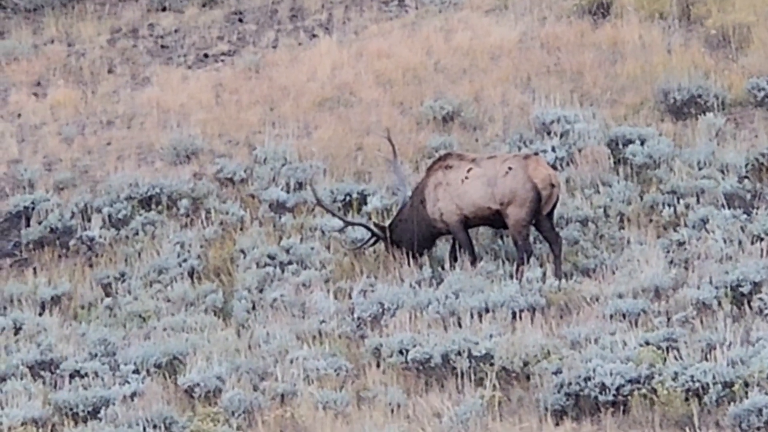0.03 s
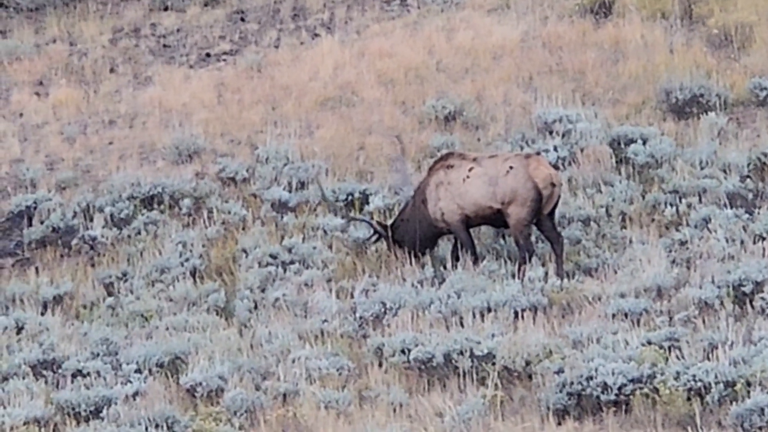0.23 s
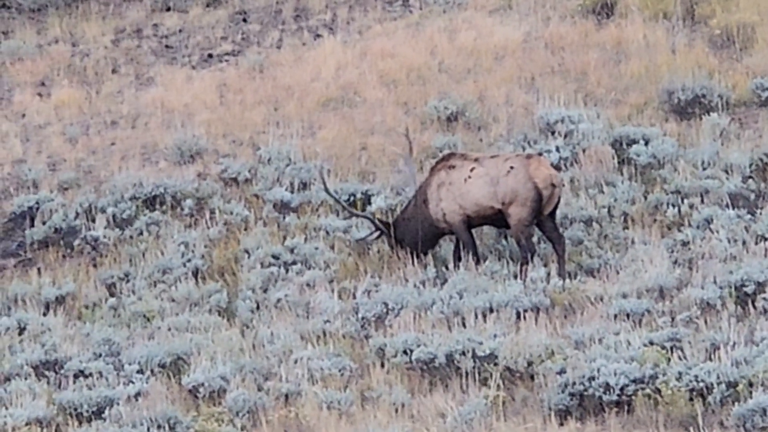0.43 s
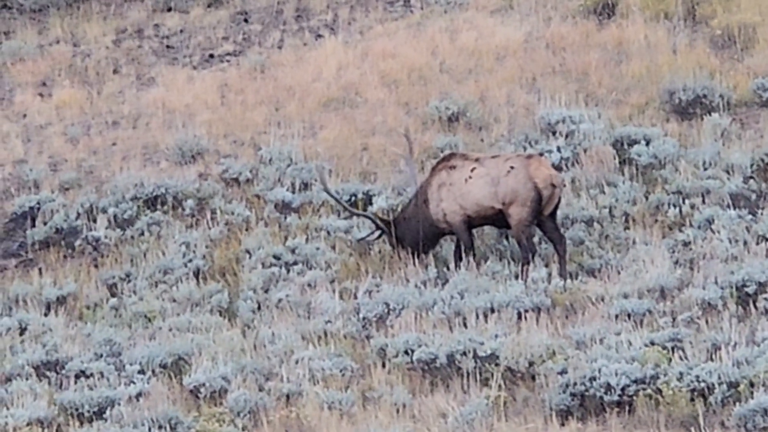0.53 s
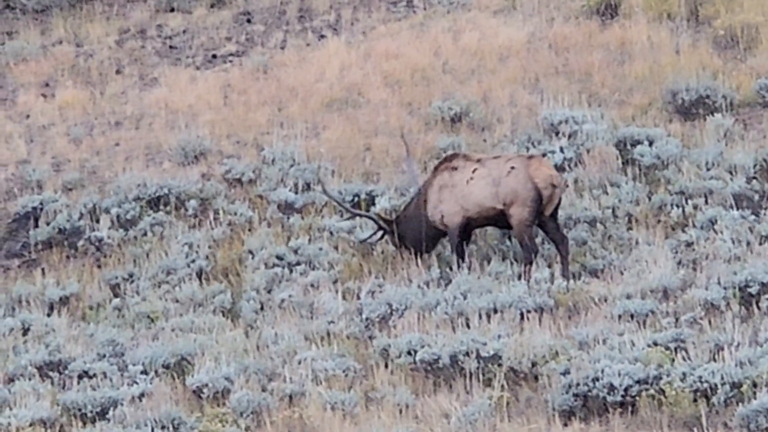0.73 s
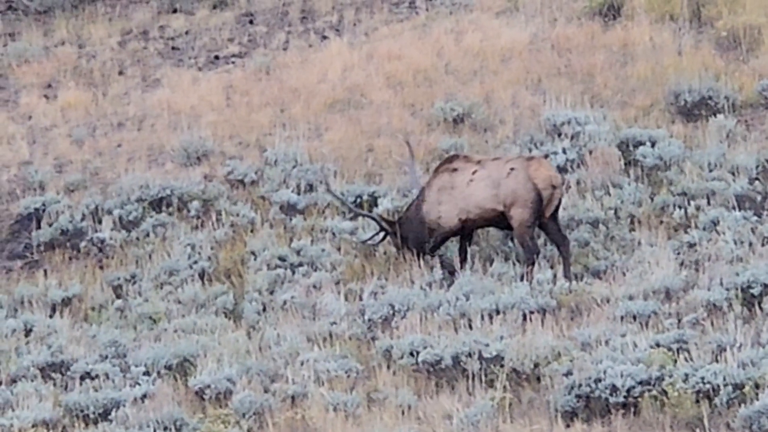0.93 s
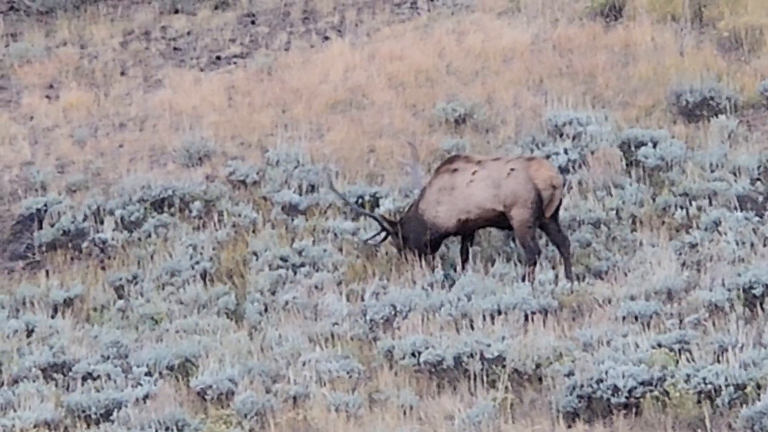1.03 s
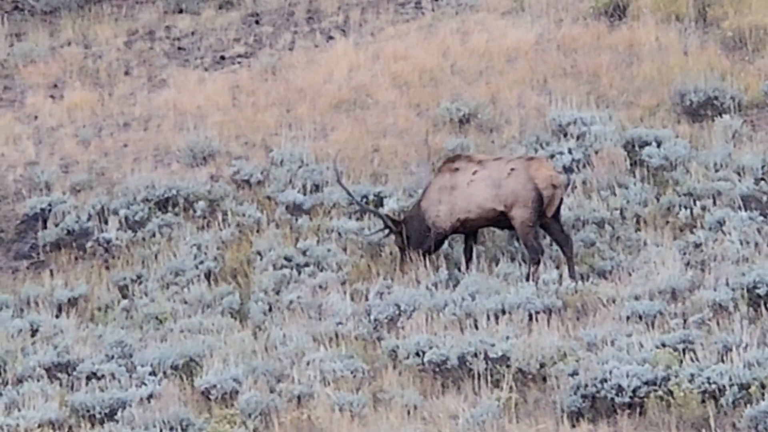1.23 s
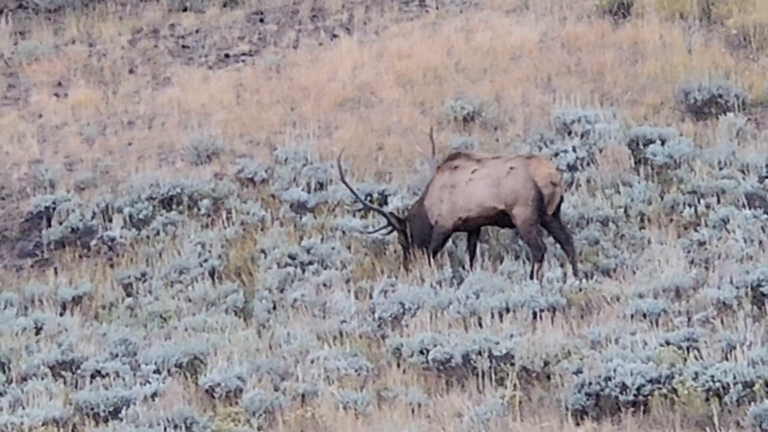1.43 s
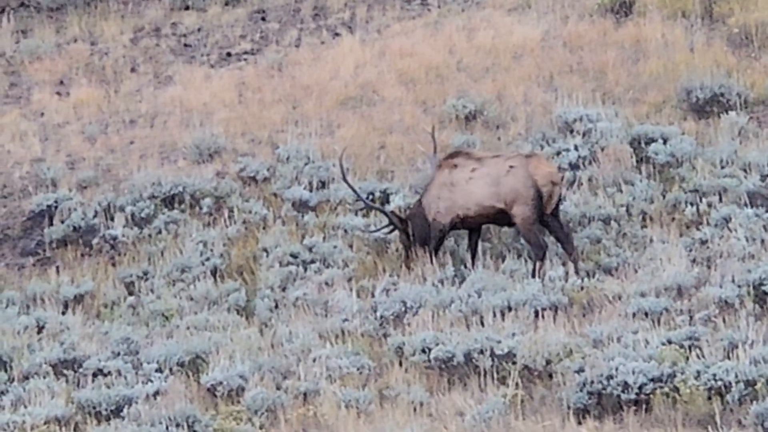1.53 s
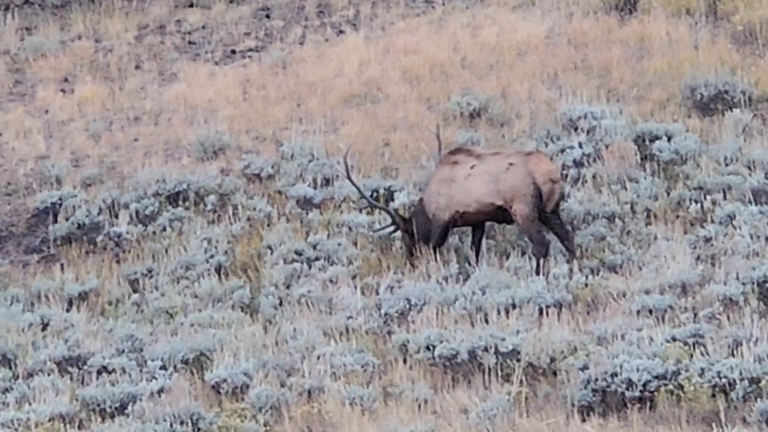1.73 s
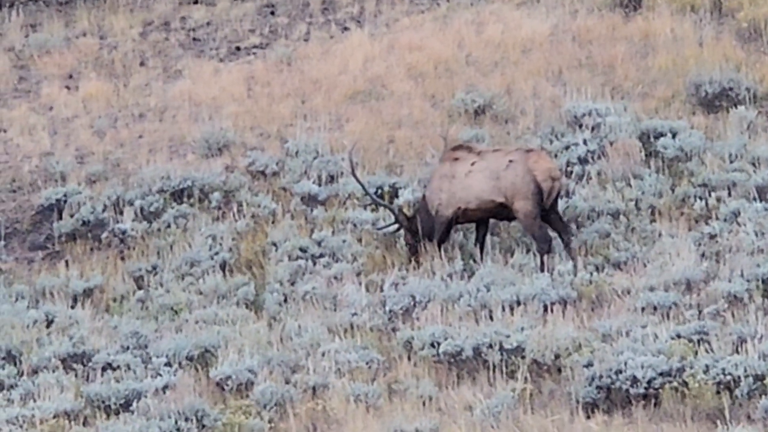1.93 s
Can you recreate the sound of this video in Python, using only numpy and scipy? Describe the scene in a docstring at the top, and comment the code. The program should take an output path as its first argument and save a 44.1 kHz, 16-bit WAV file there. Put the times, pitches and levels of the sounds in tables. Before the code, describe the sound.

Wind gently buffets the microphone over airy hiss, with faint small bird chirps.

```python
"""Soft thuds of wind over the steady airy hiss of an open hillside swell into one gust, then die down.
The wind is heard as the pressure of turbulent eddies on the two ports of the microphone.
Far traffic drones, and a small bird gives thin U-shaped chirps from the two sides of its syrinx.
Far whistles, a tiny tick, a soft crunch in the brush and a dull bump barely rise above the hiss."""
import sys
import numpy as np
from scipy import signal
from scipy.fft import rfft, irfft
from scipy.io import wavfile
from scipy.ndimage import uniform_filter1d

SR = 44100
rng = np.random.default_rng(int(sys.argv[2]) if len(sys.argv) > 2 else 0)


def dump_mix(stems):
    """Bounce the given channels to the path in sys.argv[1] as a 16-bit WAV at rate SR."""
    frames = np.atleast_2d(stems).T  # one column per channel
    limited = np.clip(frames, -1, 1)  # hard clip at full scale
    pcm = np.round(limited * 32767).astype(np.int16)
    wavfile.write(sys.argv[1], SR, pcm)


N = 88200
T = np.arange(N) / SR
FREQS = np.maximum(np.arange(N // 2 + 1) * SR / N, 1)

# microphone self-noise (frequency [Hz], relative density [dB])
SELF_NOISE_SPECTRUM = [(7000, -35), (9400, -18), (10300, -12), (11000, -15), (11800, -9.5), (13000, -7),
                       (14000, -6), (14700, 0), (15300, -4), (15700, -5.5)]
# air over the slope (frequency [Hz], relative density [dB], balance [dB]); balance is left minus right
AIR_SPECTRUM = [(61, -7, -2.5), (192.5, 3.5, -8), (295.6, 1.5, 7.5), (432, -3.5, -5), (617, -8, 0.5),
                (760, -8, 2.5), (1076, -9, -1), (1555, -10.5, -1), (2430, -14, -3.5), (2750, -19, 1),
                (3560, -16, -6.5), (4720, -22, -3.5), (5590, -26.5, -2), (6880, -33.5, 3), (7800, -32.5, 1),
                (8900, -46.5, 0), (12500, -53.5, -3)]
# far road noise (centre [Hz], width [Hz], level [dB], balance [dB])
TRAFFIC_BANDS = [(405.5, 48, -74.5, 5), (1013, 140, -82, -8.5), (3820, 800, -91, 2.5)]
# far whistles (time [s], half length [s], pitch [Hz], level [dB])
FAR_WHISTLES = [(.325, .022, 980, -79), (.44, .022, 970, -80), (.897, .022, 2940, -79.5)]
# crunch of dry stems (time [s], level [dB])
CRUNCH_PEAKS = [(1.48, -67.5)]
# resonances of the crunch (centre [Hz], width [Hz], relative level [dB])
CRUNCH_BANDS = [(980, 350, 0), (2300, 650, -4)]
# bright tick (time [s], level [dB], balance [dB])
TICK_PEAKS = [(.895, -76.5, 5)]
# chirps (middle time [s], length [s], lowest pitch [Hz], fall [Hz], rise [Hz],
# relative level of the fall [dB], relative level of the rise [dB], balance [dB])
CHIRP_SWEEPS = [(0.265, 0.015, 6650, 1800, 2000, -78, -77, -2),
                (0.529, 0.02, 7400, 1000, 1300, -85, -84, -8),
                (0.586, 0.014, 7150, 2000, 2100, -70, -70, -1),
                (.649, 0.015, 6490, 2500, 2200, -70, -72.5, -8),
                (0.882, 0.022, 6350, 300, 2700, -84, -75, 5),
                (1.126, 0.028, 6650, 2500, 4000, -78, -71.5, 1),
                (1.240, 0.023, 6340, 1700, 2700, -78, -70.5, -1),
                (1.376, 0.026, 6200, 2200, 2800, -77.5, -67.5, -4),
                (1.618, .028, 6600, 2100, 1600, -77, -83, 0)]
# single eddies (time [s], half length [s], relative level [dB], balance [dB], frequency [Hz])
EDDY_IMPACTS = [(0.034, 0.031, -49, 4, 62.8), (0.238, 0.028, -45, 3.5, 47.1), (0.321, 0.015, -40, 20, 51),
                (0.322, 0.016, -55, 12, 130), (0.388, 0.011, -39, 9, 72), (0.421, 0.015, -31, 8, 55),
                (0.437, 0.013, -40.5, 7, 112), (.481, 0.015, -38, -8.5, 45), (0.514, 0.018, -31, 5, 55),
                (0.52, 0.013, -44.5, 12, 112), (0.623, 0.0073, -46.5, 14, 138), (0.642, 0.025, -41, 12, 58),
                (.686, .015, -41.5, 3, 98), (0.722, .021, -31.5, 1.5, 45), (0.817, 0.016, -29.5, 4, 50),
                (.902, 0.0092, -36.5, 21, 50.4), (1.009, 0.02, -39.5, -4, 43),
                (1.085, 0.0088, -39, -35, 46), (1.225, 0.0081, -44.5, -11, 39),
                (1.433, 0.057, -50.5, -15, 49), (1.521, 0.022, -42, -6, 44.7),
                (1.733, 0.0081, -40.5, 7, 46.4), (1.848, 0.017, -48, 6, 49)]
# course of the gust (time [s], relative level [dB], balance [dB])
GUST_ENVELOPE = [(0, -58, 3), (.18, -57, 3), (.36, -55, 6), (.40, -47, 4), (.5, -44, 3), (.56, -46, 3),
                 (.67, -45, 4), (.76, -50, 5), (.95, -52, 2), (1.06, -53, 0), (1.12, -60, 3),
                 (1.3, -57, -1), (1.48, -52, -4), (1.65, -61, 0), (1.7, -55, 6), (1.8, -59, 3), (2, -59, 2)]
# rumble at the height of the gust (frequency [Hz], relative density [dB])
GUST_SPECTRUM = [(12, -27.5), (24, -6.5), (42, -1), (60, -5), (90, -6), (120, -10.5), (160, -26),
                 (250, -45.5), (1500, -120)]
# rumble in the lull (frequency [Hz], relative density [dB])
LULL_SPECTRUM = [(12, -22), (24, -1), (42, 2.5), (68, -5.5), (95, -20), (130, -19), (200, -30.5),
                 (400, -49), (1500, -120)]


def undb(db):
    """Amplitude grows tenfold for every 20 dB."""
    return 10 ** (np.asarray(db) / 20)


def unit(x):
    """Normalisation to an rms of 1."""
    return x / np.sqrt(np.mean(x ** 2))


def colour(points, column=1):
    """Spectral envelope: a table column interpolated over log frequency."""
    table = np.array(points, float)
    return np.interp(np.log(FREQS), np.log(table[:, 0]), table[:, column])


def resonance(hz, width_hz):
    """Resonance: the squared magnitude of a second-order band-pass."""
    return 1 / (1 + ((FREQS ** 2 - hz ** 2) / (FREQS * width_hz * 0.98)) ** 2)


def shape(x, gain):
    """Linear filtering: the spectrum is multiplied by a gain per frequency."""
    return irfft(rfft(x) * gain, N)


def noise(gain, channels=2):
    """Filtered white noise of rms 1, incoherent between channels."""
    return unit(shape(rng.standard_normal((channels, N)), gain))


def walk(rate_hz):
    """Random modulation: low-passed noise of rms 1."""
    return noise(np.exp(-(FREQS / rate_hz) ** 2), channels=1)[0]


def pan(balance_db):
    """Constant-power panning: left and right gains for a level difference."""
    gains = undb(np.array([np.atleast_1d(balance_db), -np.atleast_1d(balance_db)]) / 2)
    return gains / np.sqrt(np.mean(gains ** 2, axis=0))


def arrive(x, lag_s):
    """Path difference: sound from the left reaches the right port later."""
    return shape(x, np.exp(-2j * np.pi * FREQS * np.array([[0], [lag_s]])))


def even(x, span_s, amount):
    """Envelope compression: swells slower than the span are flattened by an amount from 0 to 1."""
    size = int(span_s * SR)
    power = abs(signal.hilbert(x)) ** 2
    smoothed = uniform_filter1d(uniform_filter1d(power, size), size)
    return unit(x / smoothed ** (amount / 2))


def air():
    """Diffuse field: incoherent hiss from the whole slope, each half octave flickering on its own."""
    level_db, flicker_db = -66.5, 0.59
    hiss = noise(undb(colour(AIR_SPECTRUM)) * pan(colour(AIR_SPECTRUM, column=2)))
    half_octaves = np.clip(2 * np.log2(FREQS / 125), 0, 13)
    out = 0
    for k in range(14):
        band = shape(hiss, np.maximum(1 - abs(half_octaves - k), 0))
        out += band * undb(flicker_db * walk(29))
    return out * undb(level_db)


def traffic():
    """Band-limited noise: the drone and tyre hiss of a far road keep a nearly constant level."""
    road = 0
    for hz, width_hz, db, balance_db in TRAFFIC_BANDS:
        band = noise(resonance(hz, width_hz), channels=1)
        road += even(band, span_s=0.11, amount=0.76) * undb(db) * pan(balance_db)
    return arrive(road, lag_s=0.00033)


def far_bird():
    """Frequency modulation: slight random changes of pitch make short pure whistles waver."""
    clock = np.cumsum(1 + 0.012 * walk(80)) / SR
    out = 0
    for time_s, half_s, hz, db in FAR_WHISTLES:
        tone = np.sqrt(2) * np.sin(2 * np.pi * hz * clock)
        out += tone * undb(db) * np.exp(-((T - time_s) / half_s) ** 2)
    return out


def brush_crunch():
    """Noise-excited resonance: dry stems crunch with a fast rise and an exponential decay."""
    attack_s, decay_s = 0.006, 0.015
    body = noise(sum(undb(db) * resonance(hz, width_hz) for hz, width_hz, db in CRUNCH_BANDS))
    envelope = 0
    for time_s, db in CRUNCH_PEAKS:
        envelope += undb(db) * np.exp(-np.maximum((time_s - T) / attack_s, (T - time_s) / decay_s))
    return body * envelope


def bump():
    """A pulse of low-frequency noise is heard as a dull knock, alike on both sides."""
    time_s, half_s, level_db = 1.732, 0.012, -65
    body = noise(resonance(hz=290, width_hz=220), channels=1)
    return body * undb(level_db) * np.exp(-((T - time_s) / half_s) ** 2)


def tick():
    """A very short pulse of high-frequency noise is heard as a bright tick."""
    half_s = 0.0013
    burst = noise(resonance(hz=7800, width_hz=3200), channels=1)
    return sum(burst * undb(db) * np.exp(-((T - time_s) / half_s) ** 2) * pan(balance_db)
               for time_s, db, balance_db in TICK_PEAKS)


def small_bird():
    """Two-voice phonation: both sides of the syrinx dive and climb; scattering in brush adds a tail."""
    bend_exponent, pitch_wobble = 2.4, 0.013
    dip_db, trim_db, flutter_db = -11, -2.5, 1.8
    second_lead_s, second_db = 0.0017, -11  # one side sweeps earlier and is weaker
    scatter_s, scatter_db = 0.02, -4
    direct = np.zeros((2, N))
    for time_s, length_s, low_hz, fall_hz, rise_hz, fall_db, rise_db, balance_db in CHIRP_SWEEPS:
        u = np.clip((T - time_s) / (length_s / 2), -1, 1)  # -1 to 1 across the chirp
        swell = np.sin(np.pi * u ** 2) + undb(dip_db) * (1 - u ** 2) ** 2  # loudest on the flanks
        flank_db = np.interp(u, [-0.5, 0.5], [fall_db, rise_db])
        envelope = swell * undb(flank_db + trim_db + flutter_db * walk(500))
        depth_hz = np.where(u < 0, fall_hz, rise_hz)
        for lead_s, voice_db in ((0, 0), (second_lead_s, second_db)):
            hz = low_hz + depth_hz * np.minimum(abs(u + 2 * lead_s / length_s), 1) ** bend_exponent
            cycles = np.cumsum(hz * (1 + pitch_wobble * walk(720))) / SR
            direct += undb(voice_db) * envelope * np.sin(2 * np.pi * cycles) * pan(balance_db)
    tail = rng.standard_normal((2, N)) * np.exp(-T / scatter_s)
    scattered = shape(direct, rfft(unit(tail)) / np.sqrt(N))
    return arrive(direct, lag_s=0.00047) + undb(scatter_db) * scattered


def buffets():
    """Pressure pulses: each eddy striking the microphone is a thud of a few uneven, slowing swings."""
    wander_rad, trim_db = 0.53, -2.5
    slowing, skew_share = 0.1019, 0.71
    wander = wander_rad * np.array([walk(24), walk(36)])
    phases = rng.uniform(-np.pi, np.pi, (len(EDDY_IMPACTS), 2))
    out = 0
    for (time_s, half_s, db, balance_db, hz), (phase, skew) in zip(EDDY_IMPACTS, phases):
        u = (T - time_s) / half_s
        cycles = np.cumsum(hz * (1 - slowing * np.tanh(u))) / SR
        port_phase = phase + skew_share * np.array([[0], [skew]])  # the ports swing out of step
        swing = np.sqrt(2) * np.sin(2 * np.pi * cycles + wander + port_phase)
        out += swing * np.exp(-u ** 2) * undb(db + trim_db) * pan(balance_db)
    return out


def port_pressure(correlation):
    """Partial coherence: the two ports share part of their random pressure."""
    separate, shared = rng.standard_normal((2, N)), rng.standard_normal(N)
    return np.sqrt(1 - correlation) * separate + np.sqrt(correlation) * shared


def wind():
    """Turbulence: small eddies push on each port, and stronger wind sheds faster ones."""
    onset_db, knee_db, trim_db = -47.5, 6.5, 1.5
    times, levels, balances = np.array(GUST_ENVELOPE).T
    db = np.interp(T, times, levels)
    pressure = port_pressure(correlation=0.37)
    gust = unit(shape(pressure, undb(colour(GUST_SPECTRUM))))
    lull = unit(shape(pressure, undb(colour(LULL_SPECTRUM))))
    gust_share = 0.5 + 0.5 * np.tanh((db - onset_db) / knee_db)
    eddies = even(gust_share * gust + (1 - gust_share) * lull, span_s=0.029, amount=0.84)
    return eddies * undb(db + trim_db) * pan(np.interp(T, times, balances))


def scene():
    """Superposition: the pressures of all sources add at the microphone."""
    return (wind() + buffets() + air() + traffic() + small_bird()
            + tick() + far_bird() + brush_crunch() + bump())


def record(dry):
    """Self-noise and bandwidth: the microphone adds a thin hiss, and a steep low-pass cuts the top."""
    hiss_db, cutoff_hz = -80, 15750
    hiss = noise(undb(colour(SELF_NOISE_SPECTRUM))) * undb(hiss_db) * pan(balance_db=4)
    return shape(dry + hiss, 1 / (1 + (FREQS / cutoff_hz) ** 200))


dry = scene()
out = record(dry)
dump_mix(out)
```